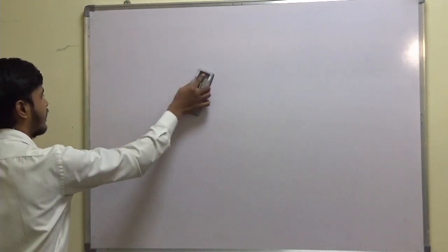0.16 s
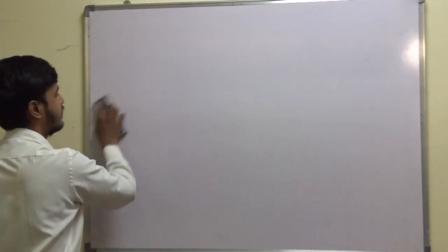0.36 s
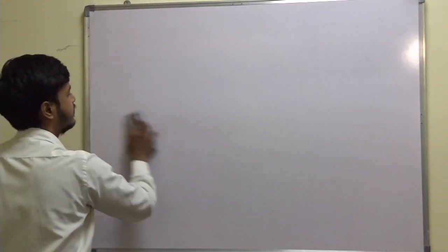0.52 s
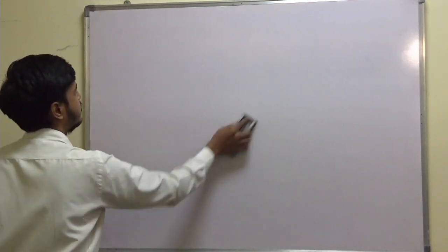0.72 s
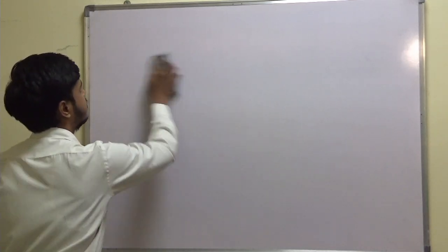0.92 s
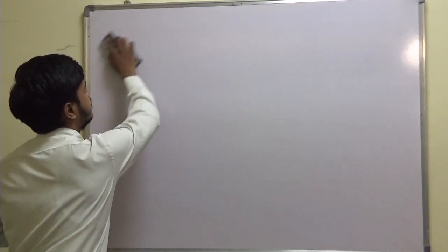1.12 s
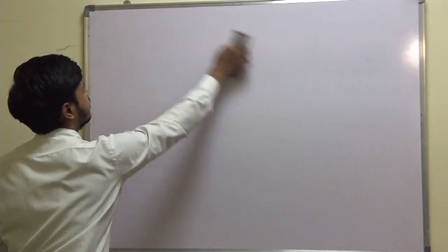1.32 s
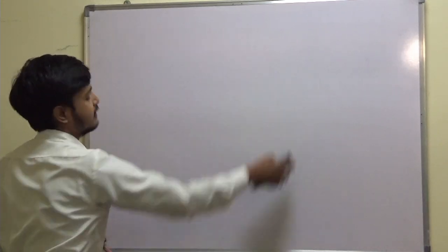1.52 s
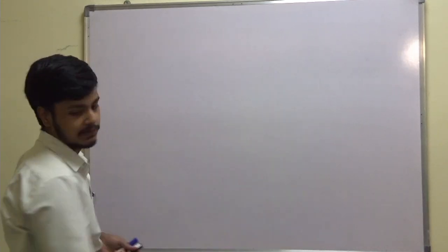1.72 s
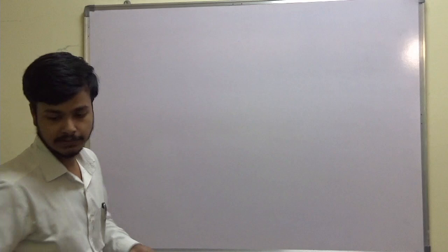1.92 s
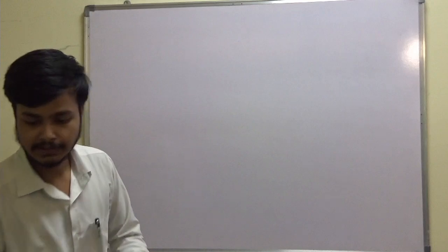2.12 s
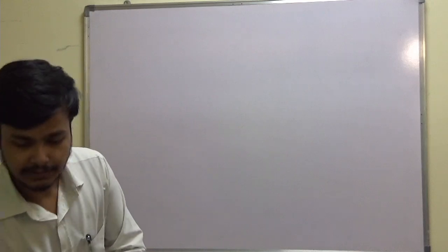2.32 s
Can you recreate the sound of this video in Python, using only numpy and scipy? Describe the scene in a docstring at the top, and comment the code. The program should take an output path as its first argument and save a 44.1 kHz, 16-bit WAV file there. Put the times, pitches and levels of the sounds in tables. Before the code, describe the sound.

A felt eraser wipes a whiteboard in five soft, hissing strokes until about 1.4 seconds, with a brief juddering scuff near 0.5 seconds. A sleeve swishes from 1.5 to 2 seconds, with a soft bump near 1.9. At 2.3 seconds comes a much louder, booming knock, like the eraser set down on a table, overloading the nearby microphone. Steady classroom air and faint hum lie underneath.

```python
"""A small classroom: a felt eraser is wiped to and fro over a whiteboard. Its fibres catch and slip,
so each stroke hisses, brighter with speed, and the board drones under it. Once the eraser judders
and scuffs. The arm drops and a sleeve swishes, with a soft bump among the swishes. Then comes a
hard knock, as of the eraser put down on a table beside the microphone, which overloads.
Steady room tone lies below."""
import sys
import numpy as np
from scipy import signal
from scipy.fft import rfft, irfft
from scipy.io import wavfile

SR = 44100
rng = np.random.default_rng(int(sys.argv[2]) if len(sys.argv) > 2 else 0)


def wav_out(sig):
    """Save sig, one row per channel (or a flat mono array), as 16-bit PCM at SR to the path in sys.argv[1]."""
    wavfile.write(sys.argv[1], SR, np.round(np.clip(np.atleast_2d(sig).T, -1, 1) * 32767).astype(np.int16))


N = 103767
T = np.arange(N) / SR


def eraser():
    """The hand speeds up and slows in each stroke; slipping felt hisses, scrapes and shakes the board."""
    # strokes, turn to turn: start/s, length/s, fastest at/share of length, level/dB,
    # relative treble/dB, scrape f/Hz, relative scrape/dB
    strokes = [(-.09, 0.28, 0.46, -49.5, -2.5, 3500, -7), (0.179, 0.28, 0.49, -47.5, -2, 3620, -7),
               (0.445, .32, 0.55, -48, -1, 3860, -6.5), (0.738, 0.4, 0.54, -48, -3, 2620, -15),
               (1.107, 0.31, .56, -47, -0.5, 3700, -11.5)]
    # colour of the felt's hiss: f/Hz, relative level/dB
    felt_spectrum = [(1500, -17.5), (2300, -10), (2800, -8), (3300, -3), (4300, -3), (4800, -5),
                     (7500, -4.5), (10000, -9.5), (13000, -10.5), (16000, -17.5)]
    # modes of the rubbed board and eraser case: f/Hz, width/Hz, level/dB
    board_modes = [(217, 11, -65), (340, 20, -60), (393.8, 18, -54), (513, 61, -68), (740, 100, -79),
                   (1080, 180, -70), (3670, 480, -60.5), (4340, 270, -68)]
    hiss_power, treble_power, board_power = 0.92, 0.31, 0.28   # how each grows with hand speed
    treble_hz = 8500
    hiss = coloured(slips(per_s=14000, spread_db=2.5), felt_spectrum)
    treble = signal.sosfiltfilt(signal.butter(2, treble_hz, "high", fs=SR, output="sos"), hiss)
    wipes, hand_speed = 0, 0
    for start, length, fastest, db, treble_db, scrape_hz, scrape_db in strokes:
        speed = 1 - np.interp((T - start) / length, [0, fastest, 1], [-1, 0, 1]) ** 2
        scrape = from_db(scrape_db) * noise_band(scrape_hz, width_hz=960)
        felt = hiss - treble + treble * from_db(treble_db) * speed ** treble_power
        wipes += from_db(db) * speed ** hiss_power * (felt + scrape)
        hand_speed += speed
    drag = slips(per_s=2500, spread_db=2)
    drone = sum(from_db(db) * resonance(drag, hz, width) for hz, width, db in board_modes)
    return wipes + hand_speed ** board_power * drone


def knock(at_s=2.286):
    """A hard blow on the table: crack and click, the top's swelling, beating boom and a diffuse ring."""
    # low modes of the table top: f/Hz, level/dB, t60/s
    table_modes = [(157.6, 7.5, 0.13), (195.3, 13.5, 0.11)]
    # bright modes of the hard contact: f/Hz, level/dB, t60/s
    click_modes = [(860, -16.5, .025), (1204, -14, 0.037), (1667, -13.5, 0.013), (2880, -23.5, 0.011),
                   (3820, -24.5, 0.006), (5700, -23.5, 0.0047), (7770, -29, 0.0037)]
    # colour of table and room ringing on: f/Hz, relative level/dB
    ring_spectrum = [(30, -4), (70, 11), (120, 2.5), (300, -2.5), (450, 0), (850, -4.5), (1250, 1.5),
                     (1600, -8), (2200, -15.5), (2900, -17), (5000, -25.5), (8000, -39), (16000, -52)]
    crack_db, crack_decay_s, crack_top_hz = -26.5, 0.0011, 3500
    boom_rise_s = 0.01306
    ring_db, ring_t60_s, ring_attack_s = -17.5, 0.55, 0.0019
    age = np.maximum(T - at_s, 0)
    lowpass = signal.butter(2, crack_top_hz, fs=SR, output="sos")
    crack_noise = rms_one(signal.sosfilt(lowpass, rng.standard_normal(N)))
    crack = from_db(crack_db) * (age > 0) * np.exp(-age / crack_decay_s) * crack_noise
    boom = (1 - np.exp(-(age / boom_rise_s) ** 2)) * struck(table_modes, age)
    ring_envelope = from_db(ring_db - 60 * age / ring_t60_s) * np.minimum(age / ring_attack_s, 1)
    ring = ring_envelope * coloured(rng.standard_normal(N), ring_spectrum)
    return crack + struck(click_modes, age) + boom + ring


def scuff():
    """The eraser judders: its case clacks, and the felt slips in short, coarse, dying bursts."""
    # bursts of the judder: t/s, level/dB, decay/s
    judders = [(0.532, -36.5, .05), (.578, -57, 0.019), (0.603, -45, 0.011)]
    # colour of the scuff: f/Hz, relative level/dB
    scuff_spectrum = [(150, -23), (260, 0), (345, 10.5), (480, -2.5), (690, 5), (1200, -6.5), (1550, -8),
                      (2200, -10), (4500, -16), (9000, -32), (16000, -42)]
    attack_s = 0.0064
    clack_db, clack_decay_s = -43, 0.019
    envelope = 0
    for start, db, decay in judders:
        age = np.maximum(T - start, 0)
        envelope += from_db(db) * np.minimum(age / attack_s, 1) * np.exp(-age / decay)
    clack_age = np.maximum(T - judders[0][0], 0)
    clack_envelope = from_db(clack_db) * (clack_age > 0) * np.exp(-clack_age / clack_decay_s)
    clack = clack_envelope * resonance(rng.standard_normal(N), hz=1800, width_hz=1200)
    return clack + envelope * coloured(slips(per_s=4500, spread_db=2.5), scuff_spectrum)


def sleeve():
    """Cloth slides over cloth in smooth swells, each trailed by a narrow rasp."""
    # swishes: centre t/s, half length/s, level/dB
    swishes = [(1.469, 0.047, -45), (1.62, 0.05, -55), (1.755, 0.019, -54), (1.824, .04, -59),
               (1.925, 0.024, -53), (1.999, 0.053, -46)]
    # colour of the sliding cloth: f/Hz, relative level/dB
    cloth_spectrum = [(300, -7.5), (700, 1), (1300, -2), (1900, -5.5), (2900, 0), (4200, -2.5), (5500, -7),
                      (8000, -7.5), (10500, -17), (16000, -29)]
    rasp_db, rasp_lag_s = -10, 0.043   # relative to the swish
    envelope = sum(from_db(db) * swell(centre, half) for centre, half, db in swishes)
    trailing = np.interp(T - rasp_lag_s, T, envelope)
    rasp = from_db(rasp_db) * trailing * noise_band(hz=2980, width_hz=700)
    return envelope * coloured(slips(per_s=6800, spread_db=2.5), cloth_spectrum) + rasp


def bump(hz=194.5, db=-34.5):
    """A soft nudge makes the table boom briefly."""
    return from_db(db) * swell(centre_s=1.916, half_s=0.015) * np.sin(2 * np.pi * hz * T)


def reverb(x, t60_s=0.72, wet_db=-9.5):
    """The classroom adds a diffuse, dying tail."""
    tail = rng.standard_normal(N) * from_db(-60 * T / t60_s)
    return x + from_db(wet_db) * signal.fftconvolve(x, tail / np.linalg.norm(tail))[:N]


def room_tone(air_db=-46.5):
    """A steady rush of air, coloured by the room's resonances, with a faint hum."""
    # colour of the air: f/Hz, relative level/dB
    air_spectrum = [(25, -6), (55, -6), (95, -17), (125, -6), (210, -2), (400, -1), (600, -7), (1150, -9),
                    (1550, -15), (1850, -15), (2600, -20), (4800, -25), (8000, -26.5), (11000, -33.5),
                    (15500, -36.5)]
    # steady tones in the room: f/Hz, level/dB
    hum_tones = [(69, -64), (119, -60.5), (146, -66), (200, -57), (397, -61.5)]
    # room resonances in the rush of air: f/Hz, width/Hz, level/dB
    room_modes = [(247, 9.2, -60.5), (298.5, 17, -64.5), (340, 11, -62.5), (699, 20, -65.5),
                  (782, 8.3, -66.5), (1145, 25, -65)]
    hum = sum(from_db(db) * np.sqrt(2) * np.sin(2 * np.pi * (hz * T + rng.random()))
              for hz, db in hum_tones)
    drone = sum(from_db(db) * resonance(rng.standard_normal(N), hz, width)
                for hz, width, db in room_modes)
    return from_db(air_db) * coloured(rng.standard_normal(N), air_spectrum) + drone + hum


def slips(per_s, spread_db):
    """Fibres catch and let go: tiny random clicks of uneven size."""
    sizes = from_db(spread_db * np.minimum(rng.exponential(1, N), 5)) * rng.choice([-1, 1], N)
    return sizes * (rng.random(N) < per_s / SR)


def struck(modes, age):
    """A struck body rings in decaying modes of alternating sign."""
    return sum((-1) ** k * from_db(db - 60 * age / t60) * np.sin(2 * np.pi * hz * age)
               for k, (hz, db, t60) in enumerate(modes))


def swell(centre_s, half_s):
    """A bell-shaped envelope, down to 1/e at half_s either side of its centre."""
    return np.exp(-((T - centre_s) / half_s) ** 2)


def noise_band(hz, width_hz):
    """Pitched noise: white noise passed twice through one resonance; rms 1."""
    return resonance(resonance(rng.standard_normal(N), hz, width_hz), hz, width_hz)


def resonance(x, hz, width_hz):
    """Two-pole band-pass; rms 1."""
    radius = np.exp(-np.pi * width_hz / SR)
    feedback = [1, -2 * radius * np.cos(2 * np.pi * hz / SR), radius * radius]
    return rms_one(signal.lfilter([1, 0, -1], feedback, x))


def coloured(x, spectrum):
    """Shape a steady signal with an EQ curve; rms 1."""
    hz, db = np.transpose(spectrum)
    bin_hz = np.maximum(np.arange(N // 2 + 1) * SR / N, 1)
    gain = from_db(np.interp(np.log(bin_hz), np.log(hz), db))
    return rms_one(irfft(rfft(x) * gain, N))


def from_db(db):
    """Decibels to gain."""
    return 10 ** (np.asarray(db) / 20)


def rms_one(x):
    """Scale to unit rms."""
    return x / np.sqrt(np.mean(x ** 2) + 1e-20)


def scene():
    """Mono mix: wiping and arm movement in the room's reverb, the close knock, and room tone."""
    return (reverb(eraser() + scuff() + sleeve() + bump()) + knock() + room_tone())[None]


def record(dry):
    """The microphone overloads: peaks are clipped flat, then the top end is cut."""
    ceiling, cutoff_hz = 0.97, 15750
    lowpass = signal.ellip(10, 0.1, 80, cutoff_hz, fs=SR, output="sos")
    return signal.sosfilt(lowpass, np.clip(dry, -ceiling, ceiling))


dry = scene()
out = record(dry)
wav_out(out)
```